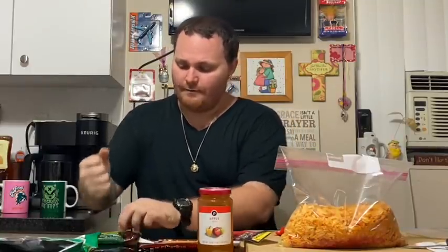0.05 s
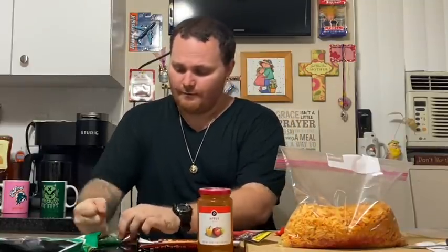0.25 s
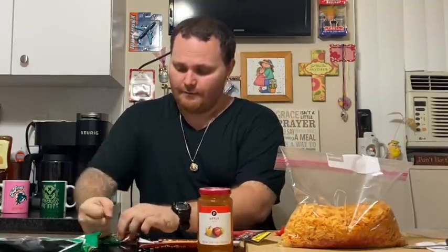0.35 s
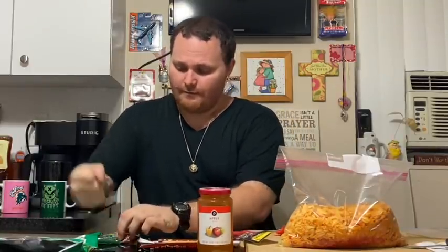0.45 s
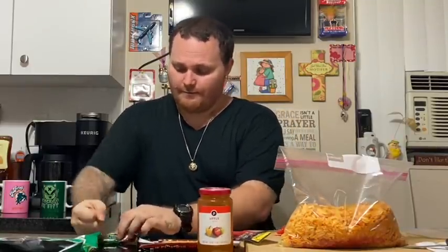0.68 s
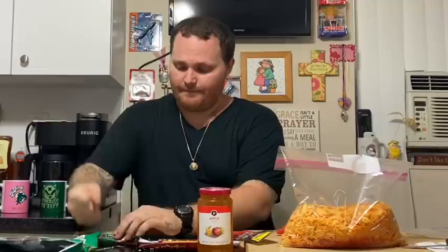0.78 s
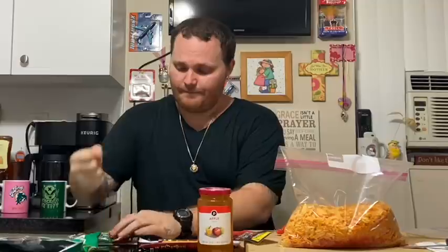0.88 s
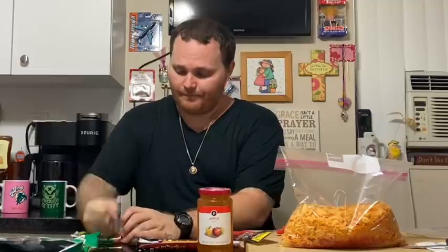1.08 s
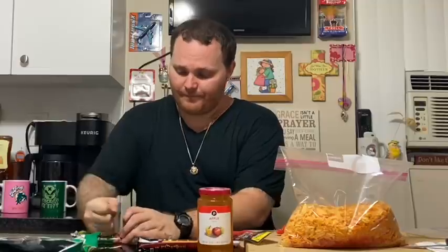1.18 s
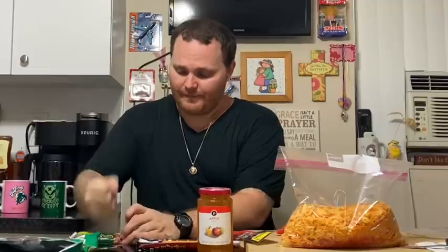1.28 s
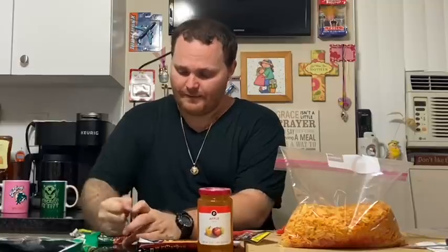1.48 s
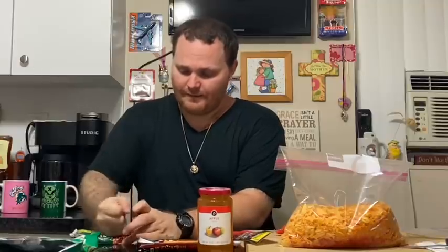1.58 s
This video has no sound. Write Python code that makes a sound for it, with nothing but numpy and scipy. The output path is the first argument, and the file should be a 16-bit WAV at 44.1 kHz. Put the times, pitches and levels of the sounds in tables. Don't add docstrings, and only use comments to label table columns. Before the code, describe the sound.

A fist pounds a foil-wrapped snack bar four times, each blow a crackly crunch and then a deep table boom with rattling, foil crinkling between; close stereo microphones in a small kitchen, faint hum.

```python
import sys
import numpy as np
from scipy import signal
from scipy.fft import rfft, irfft
from scipy.io import wavfile

SR = 44100
rng = np.random.default_rng(int(sys.argv[2]) if len(sys.argv) > 2 else 0)


def boost(x):
    u = np.asarray(x, float) / 20
    return 10 ** u


def unload_audio(sound):
    columns = np.transpose(np.atleast_2d(sound))
    steps = np.round(np.clip(columns, -1, 1) * 32767)
    wavfile.write(sys.argv[1], SR, steps.astype(np.int16))


N = 72765


def at_hz(points, hz):
    p = np.array(points, float)
    return np.interp(np.log(hz + 1), np.log(p[:, 0] + 1), p[:, 1])


def colour(x, spectrum):
    gain = boost(at_hz(spectrum, np.fft.rfftfreq(x.shape[-1], 1 / SR)))
    y = irfft(rfft(x) * gain, x.shape[-1])
    return y * np.std(x) / np.std(y)


def swell(start, rise, fall):
    t = np.arange(N) / SR - start
    onset = np.sin(np.pi / 2 * np.clip(t / rise, 0, 1)) ** 2
    return onset * np.exp(-np.maximum(t - rise, 0) / fall)


def band_pass(x, band_hz):
    return signal.sosfilt(signal.butter(2, band_hz, "band", fs=SR, output="sos"), x)


def resonate(x, hz, width_hz):
    r = np.exp(-np.pi * width_hz / SR)
    poles = [1, -2 * r * np.cos(2 * np.pi * hz / SR), r * r]
    return signal.lfilter((1 - r * r) / 2 * np.array([1, 0, -1]), poles, x + 1e-18)


# (frequency [Hz], level [dB per Hz])
HUM_COLOUR = [(15, -12), (25, 14), (1160, -10.5), (6560, -23.5), (8590, -14), (10400, -53.5), (14400, -55),
              (16000, -10)]
HUM_DB = -59.5


def room_hum():
    return boost(HUM_DB) * colour(rng.standard_normal((2, N)), HUM_COLOUR)


# (frequency [Hz], 60 dB decay time [s])
ROOM_DECAY = [(60, 0.56), (200, 0.4), (1000, 0.28), (4000, 0.39), (15000, 0.16)]
ROOM_DB, ROOM_START_S = -6.5, .007
# (frequency [Hz], left-right likeness [0 to 1])
LIKENESS = [(200, .98), (350, .9), (600, .4), (3500, .5), (5500, .2), (7200, .3), (8500, .93), (16000, .95)]


def kitchen(x):
    size = SR * 3 // 4
    t = np.arange(size) / SR
    edges = 40 * 2 ** np.arange(0, 9.1, .75)
    white = rng.standard_normal((2, 2, size))
    tail = 0
    for k, (low, high) in enumerate(zip(edges, edges[1:])):
        hz = np.sqrt(low * high)
        alike = np.clip(at_hz(LIKENESS, hz), 0, 1)
        band = band_pass(white[k % 2], [low, high])
        decay = boost(-60 * t / at_hz(ROOM_DECAY, hz))
        tail = tail + band * decay * np.sqrt([[1 + alike], [1 - alike]])
    tail = tail * np.clip(t / ROOM_START_S, 0, 1) ** 2
    tail = boost(ROOM_DB) * tail / np.sqrt(np.sum(tail ** 2))
    return signal.fftconvolve(x[None], tail, axes=1)[:, :N]


# (frequency [Hz], level [dB per Hz])
WRAPPER_COLOUR = [(290, -13), (500, -8.5), (1730, -8), (2690, -9.5), (8800, -14), (10200, -12),
                  (11600, -12.5), (15800, -17), (16500, -62)]


def crackle(rate, spread_db):
    sizes = boost(spread_db * np.minimum(rng.exponential(1, N), 4)) * rng.choice([-1, 1], N)
    clicks = sizes * (rng.random(N) < rate / SR)
    x = colour(clicks, WRAPPER_COLOUR)
    return x / np.std(x)


# (time [s], rise [s], fall [s], level [dB], body level [dB])
RUSTLES = [(-.03, 0.012, 0.029, -49.5, -23), (0.077, 0.011, .12, -48, -34), (.163, 0.0016, 0.01, -51.5, 0),
           (0.361, 0.016, .03, -44.5, -8), (.69, 0.0087, 0.069, -47.5, -45),
           (0.739, 0.021, 0.034, -46, -45), (.815, 0.0017, 0.11, -59, -16),
           (0.973, 0.01, 0.025, -54.5, -13.5), (0.999, 0.021, 0.084, -52, -39),
           (1.223, 0.034, 0.027, -39.5, -13.5), (1.608, 0.023, 0.055, -46, -8.5)]
CRINKLES_PER_S, CRINKLE_SPREAD_DB = 7000, 3.0
BODY_HZ = (464, 1830)
BAR_HZ, BAR_WIDTH_HZ, BAR_DB = 554, 30, 1.0


def crinkle():
    foil = crackle(CRINKLES_PER_S, CRINKLE_SPREAD_DB)
    body = band_pass(foil, BODY_HZ)
    bar = boost(BAR_DB) * resonate(body, BAR_HZ, BAR_WIDTH_HZ) * 4
    body = (body + bar) / np.std(body)
    out = np.zeros(N)
    for s, rise, fall, db, body_db in RUSTLES:
        out += boost(db) * swell(s, rise, fall) * (foil + boost(body_db) * body)
    return out


# (time [s], peak level [dB], lowest frequency [Hz], highest frequency [Hz])
FOLD_SNAPS = [(.0785, -41, 5000, 14000), (.0855, -32, 5800, 14000), (.1645, -32, 700, 2200),
              (.48, -50, 9000, 15000), (.7455, -30, 5000, 15000), (.8185, -25, 9500, 17000),
              (.984, -46, 700, 1800), (1.005, -42, 6000, 14000), (1.044, -42, 700, 2000),
              (1.232, -40, 7500, 15000), (1.2465, -29, 3500, 14000), (1.256, -32, 5000, 14000),
              (1.268, -33, 600, 1500), (1.625, -40, 1200, 2200), (1.64, -32, 500, 4500)]
SNAP_S = .0004


def snaps():
    out = np.zeros(N)
    for s, db, low_hz, high_hz in FOLD_SNAPS:
        burst = rng.standard_normal(N) * swell(s, SNAP_S, SNAP_S)
        snap = band_pass(burst + 1e-18, [low_hz, high_hz])
        out += boost(db) * snap / np.max(np.abs(snap))
    return out


# (time of first touch [s], crush level [dB], table level [dB],
# swinging before the deepest swing [s], swinging after it [s])
FIST_BLOWS = [
    (0.2117, -24, -8, 0.0078, 0.0028),
    (0.5516, -27, -11.5, 0.0098, 0.0013),
    (1.0751, -26.5, -14.5, 0.0063, 0.005),
    (1.4387, -28, -16, 0.0044, .012),
]
CRUSH_RISE_S, CRUSH_FALL_S = .0045, .004
CRUSH_TAIL_S, CRUSH_TAIL_DB = 0.04, -2
CRACKS_PER_S, CRACK_SPREAD_DB = 12000, 2.8


def crush():
    burst = np.zeros(N)
    for s, crush_db, *_ in FIST_BLOWS:
        quick = swell(s, CRUSH_RISE_S, CRUSH_FALL_S)
        settling = boost(CRUSH_TAIL_DB) * swell(s, CRUSH_RISE_S, CRUSH_TAIL_S)
        burst += boost(crush_db) * (quick + settling)
    return burst * crackle(CRACKS_PER_S, CRACK_SPREAD_DB)


# (time [s], first, second and third resonance [Hz])
HAND_KNOCKS = [
    (.2163, 533, 1210, 1850),
    (.5558, 791, 1650, 2230),
    (1.0783, 1170, 1590, 2840),
    (1.4435, 797, 1190, 1600),
]
# (first [dB], second [dB], third [dB])
HAND_KNOCK_DB = [(-21, -14, -15), (-24, -21, -22), (-22, -24, -22), (-22, -23, -22)]
KNOCK_T60_S, KNOCK_SOFT_S = .028, .0012


def knock():
    out = np.zeros(N)
    for (s, *peaks), levels_db in zip(HAND_KNOCKS, HAND_KNOCK_DB):
        u = np.maximum(np.arange(N) / SR - s, 0)
        soft = 1 - np.exp(-u / KNOCK_SOFT_S)
        for hz, db in zip(peaks, levels_db):
            ring = np.sin(2 * np.pi * (hz * u + rng.random()))
            out += boost(db - 60 * u / KNOCK_T60_S) * ring * soft
    return out


# (time [s], swing frequency [Hz])
TABLE_FLEX = [(.2364, 160), (.5751, 165), (1.0985, 172), (1.4543, 158)]
# (frequency [Hz], 60 dB decay time [s])
TABLE_MODES = [(60, 0.63), (94, 0.37), (157, 0.77), (208, 0.21), (275, 0.27), (312, 0.27), (418, 0.088),
               (520, 0.19)]
MODE_REACH = [(-20.5, -22, -14.5, -21), (-13, -15.5, -19, -30), (-14, -11, -19, -14),
              (-15.5, -11.5, -13, -13)]
MODE_OFFSET_DB = (-12, 0.5, -17, -3, 1.5, -1.5, -2, -6.5)
FLEX_EDGE = 1.9
PUSH_S = 0.0022
RATTLE_DB, RATTLE_HZ, RATTLE_T60_S = -14, (65, 417), 0.33


def table():
    t, out, knocks = np.arange(N) / SR, np.zeros(N), np.zeros(N)
    for (_, _, db, before, after), (s, hz), reach_db in zip(FIST_BLOWS, TABLE_FLEX, MODE_REACH):
        u = t - s
        swing = np.exp(-np.abs(u / np.where(u < 0, before, after)) ** FLEX_EDGE)
        out -= boost(db) * swing * np.cos(2 * np.pi * hz * u)
        v = np.maximum(u, 0)
        push = 1 - np.exp(-v / PUSH_S)
        for k, (mode_hz, t60) in enumerate(TABLE_MODES):
            mode_db = db + reach_db[k // 2] + MODE_OFFSET_DB[k]
            out += boost(mode_db - 60 * v / t60) * np.sin(2 * np.pi * mode_hz * v) * push
        knocks += boost(db + RATTLE_DB - 60 * v / RATTLE_T60_S) * push
    rattle = band_pass(rng.standard_normal(N), RATTLE_HZ)
    return out + knocks * rattle / np.std(rattle)


def scatter(x):
    hz = np.fft.rfftfreq(N, 1 / SR)
    blur = rng.standard_normal(N) * np.exp(-np.arange(N) / SR / .012)
    blur = blur / np.sqrt(np.sum(blur ** 2))
    alike = at_hz(LIKENESS, hz)
    return irfft(rfft(x) * rfft(blur) * np.sqrt((1 - alike) / (1 + alike)), N)


# (frequency [Hz], lead of the left port [rad])
PORT_LEAD = [(0, 0), (2000, 0.1), (3200, 1.4), (5000, 1.6), (6300, 0), (8450, -3.14), (10100, -6.28),
             (12050, -9.42), (14050, -12.57), (15700, -15.71), (17000, -16.0)]
# (frequency [Hz], left minus right [dB])
PORT_BALANCE = [(60, -3), (180, 0.5), (550, 0.5), (1650, 0.5), (4970, 1), (15000, 0.5)]


def ports(shared, unshared):
    hz = np.fft.rfftfreq(2 * N, 1 / SR)
    lead = np.exp(.5j * np.interp(hz, *np.transpose(PORT_LEAD)))
    half = lead * boost(at_hz(PORT_BALANCE, hz) / 2)
    left = irfft(rfft(shared + unshared, 2 * N) * half)[:N]
    right = irfft(rfft(shared - unshared, 2 * N) / half)[:N]
    return np.array([left, right])


TABLE_ROOM_DB = -5.5


def scene():
    wrapper = crush() + knock() + crinkle() + snaps()
    boom = table()
    wet = kitchen(wrapper + boost(TABLE_ROOM_DB) * boom)
    hum = room_hum()
    near = wrapper + boom
    shared = near + wet[0] + hum[0]
    unshared = scatter(near) + wet[1] + 0.37 * hum[1]
    return ports(shared, unshared)


def band_limit(x):
    return signal.sosfilt(signal.butter(12, 16660, fs=SR, output="sos"), x)


LOW_CUT_HZ = 48
TOP_HZ, TOP_DB = 15800, -17


def record(dry):
    x = signal.sosfilt(signal.butter(2, LOW_CUT_HZ, "high", fs=SR, output="sos"), dry)
    top = signal.sosfiltfilt(signal.butter(12, TOP_HZ, "high", fs=SR, output="sos"), x)
    mix = x - (1 - boost(TOP_DB)) * top
    return band_limit(mix)


dry = scene()
out = record(dry)
unload_audio(out)
```